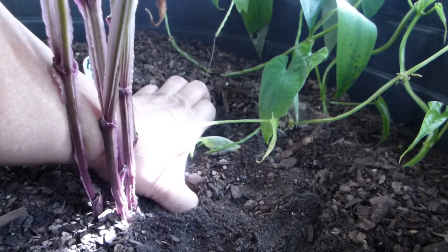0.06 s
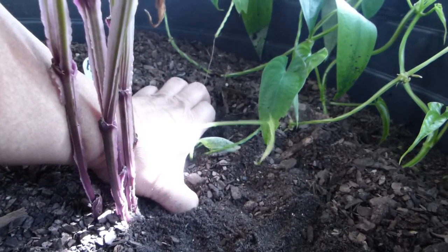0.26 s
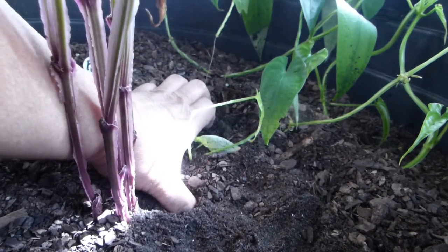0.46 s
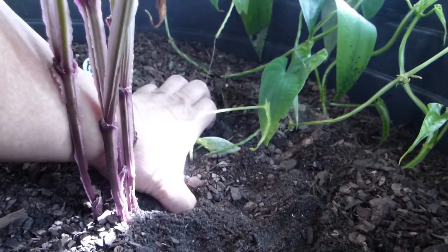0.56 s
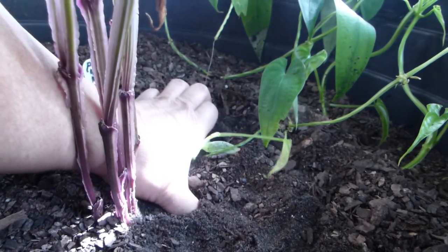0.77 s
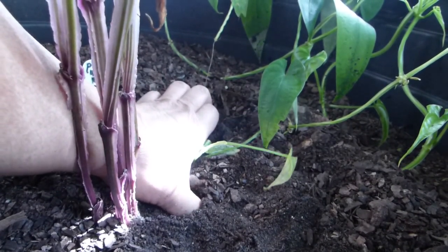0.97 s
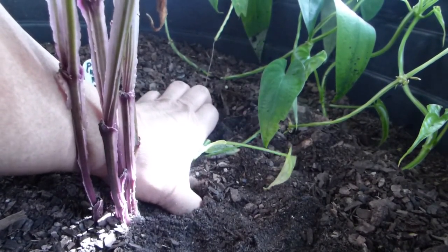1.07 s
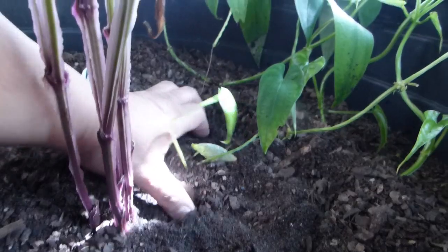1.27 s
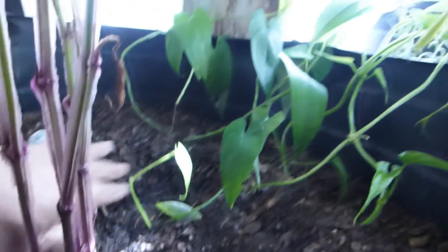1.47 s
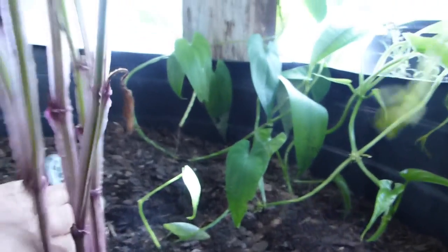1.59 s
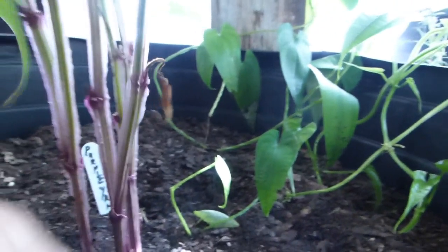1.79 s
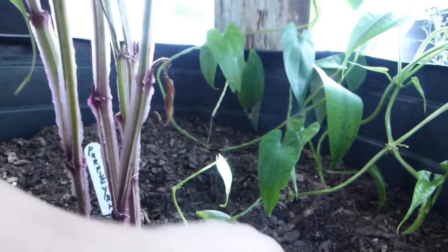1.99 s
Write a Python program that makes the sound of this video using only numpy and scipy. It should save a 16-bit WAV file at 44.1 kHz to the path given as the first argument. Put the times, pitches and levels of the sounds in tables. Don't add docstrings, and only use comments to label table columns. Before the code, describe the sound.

Fingers push into dry potting soil in a planter with bright gritty scraping and hollow knocks, stir it lightly with tiny snaps, then rake harder; close handheld stereo microphones, faint outdoor wash beneath.

```python
import sys
import numpy as np
from scipy import signal
from scipy.io import wavfile

SR = 44100
rng = np.random.default_rng(int(sys.argv[2]) if len(sys.argv) > 2 else 0)


def voltage_ratio(decibels):
    exponent = np.asarray(decibels, float) / 20
    return 10 ** exponent


def persist_wave(psi):
    counts = np.round(np.clip(psi, -1, 1) * 32767).astype(np.int16)
    wavfile.write(sys.argv[1], SR, np.atleast_2d(counts).T)


N = 90096

# [time_s, level_db, extra_fine_dust_db, extra_coarse_crumbs_db]
FINGER_DRAG = [(0, -32, -13, 13.5), (.05, -34, -17.5, 9), (.17, -48.5, -8, 6), (.23, -63, -1, -22),
               (.41, -52.5, 7, 6), (.46, -53, 4, 1), (.78, -50.5, 5.5, 4.5), (.99, -51.5, 8.5, 1),
               (1.06, -42, 8.5, 2), (1.16, -57.5, 2, -2), (1.23, -56.5, 6, -2), (1.33, -35.5, -20, -35),
               (1.4, -40.5, 3.5, 4), (1.46, -37, 14, 7), (1.545, -30, 3, -24), (1.6, -36, 2, 7.5),
               (1.9, -32, 3, 0.5), (2.04, -34.5, -12, -2)]
# [pitch_hz, density_db_per_hz]
SOIL_COLOUR = [(1200, -13.5), (2200, -9.5), (3400, -9.5), (4100, -1.5), (6000, -4.5), (8800, -2.5),
               (12000, -12.5), (15000, -45)]
# [pitch_hz, side_under_mid_db]
SOIL_WIDTH = [(1200, -10), (2500, -34), (5000, -25), (9000, -8), (15000, -4)]
# [pitch_hz, width_hz, level_db]
CRUMB_HOLLOWS = [(3144, 240, -24), (4080, 280, -13.5), (4794, 82, -22.5), (8130, 87, -14.5)]
# [middle_s, length_s, level_db, pitch_hz, breadth_ratio]
CRUMBLE_BURSTS = [(0.045, 0.049, -40, 5570, 1.7), (0.107, .025, -49, 5200, 1.1),
                  (0.148, 0.036, -54, 8000, 1.13), (.302, .01, -46.5, 7800, 1.36),
                  (0.451, 0.013, -47, 6000, 1.4), (.488, 0.014, -46.5, 5100, 1.9),
                  (.54, 0.051, -60, 4200, 1.04), (.637, .016, -55, 4800, 0.98),
                  (0.68, 0.0068, -48.5, 6950, 1.2), (0.74, 0.062, -50, 7200, 1.44),
                  (0.747, 0.014, -46.5, 6000, 1.3), (0.853, .07, -56.5, 4740, 1.2),
                  (.946, 0.031, -43.5, 6100, 1.45), (1.264, 0.043, -53.5, 9000, 1.34),
                  (1.32, 0.076, -43, 8060, 1.38), (1.332, 0.048, -44, 4090, 0.81),
                  (1.454, 0.038, -35, 5900, 1.8), (1.49, 0.17, -47, 14000, 1.06),
                  (1.573, 0.027, -33.5, 3960, 1.33), (1.646, 0.058, -37.5, 4300, 1.15),
                  (1.71, 0.068, -49, 11000, 1.4), (1.723, 0.047, -41.5, 4270, 1.3),
                  (1.866, 0.092, -42.5, 3270, 1.01), (1.88, .06, -39.5, 8460, 1.3),
                  (2.017, .04, -48, 10800, 1.15)]
# [start_s, peak_db, pitch_hz, breadth_ratio]
CHIP_SNAPS = [(0.2976, -33, 8950, 1.7), (0.3532, -41.5, 8350, 1.1), (0.3713, -35, 9300, 1.4),
              (.477, -38, 8000, 1.4), (0.445, -33, 6900, 1.9), (0.5732, -36.5, 6000, 1.3),
              (.5814, -41, 11500, 1.4), (.615, -45, 11600, 1.25), (.6235, -41, 11700, 1.06),
              (.6235, -41, 7800, 1.1), (.636, -39, 11700, 1.06), (.6445, -44, 11800, 1.24),
              (.636, -35.5, 7940, 1.1), (.6445, -36, 8400, 1.5), (.672, -35, 6900, 1.24),
              (.7127, -42, 11400, 1), (.713, -27, 5740, 2.2), (.724, -44, 11500, 1), (.728, -39, 6700, 1.1),
              (.737, -41, 11600, 1.04), (.7487, -33, 5900, 1.9), (0.758, -33, 5270, 1.2),
              (0.758, -34, 8560, 1.16), (0.674, -37, 2940, 2.7), (.8295, -42, 6400, 1.06),
              (1.0095, -38, 7950, 1.3), (1.246, -42, 10500, 1.15), (1.2714, -35, 8500, 1.4),
              (1.3114, -34, 7000, 2), (1.364, -35, 7000, 1.7), (1.4226, -28.5, 10300, 1.2),
              (1.5665, -24, 5000, 1.2), (1.668, -27, 10300, 1.15), (1.7068, -21, 9900, 1.24),
              (1.728, -29, 5440, 1.1), (1.729, -22.5, 9300, 1.14), (1.9644, -18, 9700, 1.14)]
# [pitch_hz, level_db, t60_s]
BARK_MODES = [(3220, -5.5, 0.017), (5730, 2, 0.012), (7130, 5, 0.008), (7900, -7, 0.014),
              (4950, -19, 0.0108), (8950, -9, .008)]
# [time_s, level_db, one_sidedness_db]
HAND_PUSH = [(0, -40.5, -20), (.012, -43.5, -20), (.035, -39.5, -20), (.07, -45, -10), (.18, -51, -16.5),
             (.24, -66.5, -17), (1.25, -63, -20), (1.34, -46.5, -11), (1.43, -48, 2), (1.47, -41.5, -3),
             (1.54, -33.5, -1.5), (1.585, -33, -2), (1.62, -38.5, -2), (1.78, -40.5, -4),
             (1.9, -46.5, -3.5), (1.95, -53, -5), (2.04, -47, -2)]
# [start_s, peak_db, favoured_pitch_hz, one_sidedness_db]
WALL_KNOCKS = [(.002, -23, 1300, -12), (.004, -23.5, 700, -13), (.004, -31, 367, -19),
               (0.025, -32.5, 377, -18), (.0085, -18, 1300, -14), (.015, -22, 697, -20),
               (.023, -16.5, 1280, -17), (.04, -29, 1440, -12), (.051, -27, 1300, -12),
               (.105, -37.5, 620, -18), (.137, -39, 590, -16), (.674, -42, 875, -14.5),
               (.758, -36, 1480, -11.5), (1.071, -31.5, 235, -11), (1.4425, -16, 966, -8),
               (1.4429, -27, 754, -4), (1.445, -23.5, 398, 3), (1.479, -32, 370, 6), (1.516, -27, 770, -21),
               (1.524, -23.5, 1000, -15), (1.53, -27.5, 375, 3), (1.535, -27, 1090, -10),
               (1.537, -25, 800, -19), (1.545, -30, 900, -10), (1.558, -28.5, 680, -8),
               (1.566, -26.5, 385, 2), (1.5667, -18.5, 1880, -8), (1.566, -19, 1135, -11),
               (1.5707, -22.5, 924, -15), (1.574, -27, 1150, -8), (1.683, -25, 1590, 0),
               (1.742, -24.5, 315, -10), (1.776, -22, 300, -15), (1.85, -29.5, 300, -6)]
# [pitch_hz, level_db, t60_s, one_sidedness_db]
WALL_MODES = [(163, -4, 0.029, -28), (235, -6.5, 0.036, -16), (300, -8, 0.057, -5), (375.4, -2, 0.086, -9),
              (588, 1.5, 0.052, -4.5), (710, 2, 0.025, -2.5), (800, 2, 0.054, -2.5), (954, 2, 0.019, 2),
              (1135, -1, 0.05, -7), (1300, 0, 0.028, -16), (1475, -5.5, 0.022, -6),
              (1643, -0.5, 0.045, -27), (1850, -5, 0.057, -14), (2300, 3, 0.0022, -10.5)]
# [middle_s, level_db]
PIPE_THROBS = [
    (.41, -57),
    (.49, -55.5),
    (0.582, -54.5),
    (.64, -54),
    (.695, -53.5),
    (.85, -51.5),
    (0.974, -48.5),
]
# [pitch_hz, density_db_per_hz]
GARDEN_COLOUR = [(20, -13.5), (100, -11.5), (250, -7.5), (800, -5.5), (1500, -9), (2500, -19),
                 (8000, -24.5), (15600, -34)]
# [pitch_hz, side_under_mid_db]
GARDEN_WIDTH = [(25, -13), (125, -15), (300, -11.5), (1000, -5), (1600, -16), (4000, -12), (15000, -22)]


def rms_one(x):
    return x / np.sqrt(np.mean(x ** 2) + 1e-20)


def in_time(rows):
    s, *columns = np.transpose(rows)
    return [np.interp(np.arange(N) / SR, s, column) for column in columns]


def at_hz(points, hz):
    points_hz, points_db = np.transpose(points)
    return np.interp(np.log(hz), np.log(points_hz), points_db)


def drift(rate_hz):
    r = np.exp(-40 * np.pi * rate_hz / SR)
    slow = signal.lfilter([1], [1, -2 * r, r * r], rng.standard_normal(N // 20 + 2002))[2000:]
    return np.interp(np.arange(N) / 20, np.arange(len(slow)), rms_one(slow - slow.mean()))


def ring(hits, hz, t60):
    r = voltage_ratio(-60 / (max(t60, .001) * SR))
    w = 2 * np.pi * hz / SR
    return signal.lfilter([0, np.sin(w)], [1, -2 * r * np.cos(w), r * r], hits + 1e-18)


def band(x, low_hz, high_hz):
    sos = signal.butter(2, [low_hz, min(high_hz, .45 * SR)], "band", fs=SR, output="sos")
    return signal.sosfilt(sos, x)


def high(x, hz):
    return signal.sosfilt(signal.butter(4, hz, "high", fs=SR, output="sos"), x)


def low(x, hz):
    return signal.sosfilt(signal.butter(2, hz, fs=SR, output="sos"), x)


def clicks(per_s, spread_db):
    size = voltage_ratio(spread_db * np.minimum(rng.exponential(1, N), 5)) * rng.choice([-1, 1], N)
    return size * (rng.random(N) < per_s / SR)


def spike(s, gain):
    return gain * (np.arange(N) == int(s * SR))


def stereo(mid, side):
    return np.array([mid + side, mid - side])


def soil():
    grains_per_s, grain_spread_db, grain_cycles, hiss_db = 9100, 2.5, 8.4, 3.5
    t = np.arange(N) / SR
    level_db, fine_db, coarse_db = in_time(FINGER_DRAG)
    grains = clicks(grains_per_s * voltage_ratio(3.0 * drift(60)), grain_spread_db)
    pitches = np.geomspace(1200, 15000, 24)
    dealt = rng.integers(0, 24, N)
    white = rng.standard_normal((3, N))
    clump_db = 0.1173 * np.clip(-36 - level_db, 0, 20) * drift(28.0)
    shift = 1 + 0.13 * (t < .25)
    out = 0
    for k, hz in enumerate(pitches):
        ringing = rms_one(ring(grains * (dealt == k), hz, grain_cycles / hz))
        hiss = rms_one(band(white[k % 2], hz / 1.06, hz * 1.06))
        mid = ringing + voltage_ratio(hiss_db) * hiss
        side = voltage_ratio(at_hz(SOIL_WIDTH, hz)) * rms_one(band(white[2], hz / 1.06, hz * 1.06))
        fine_tilt_db = fine_db * np.clip(np.log2(hz / 6000), 0, 2) ** 2
        coarse_tilt_db = coarse_db * np.clip(np.log2(4000 / hz), 0, 1)
        patchy_db = 1.2 * drift(8.7)
        colour_db = at_hz(SOIL_COLOUR, hz / shift) + fine_tilt_db + coarse_tilt_db
        out = out + np.sqrt(hz) * voltage_ratio(colour_db + clump_db + patchy_db) * stereo(mid, side)
    for hz, width_hz, db in CRUMB_HOLLOWS:
        mid, side = ring(white[::2], hz, 2.8 / width_hz) * voltage_ratio([[0], [-16]])
        out = out + voltage_ratio(db) * np.std(out) * rms_one(stereo(mid, side))
    out = low(out, 13700)
    lift_s, lift_length_s, lift_db = 1.947, 0.032, -8
    lift = lift_db * np.exp(-((t - lift_s) / lift_length_s) ** 2)
    return voltage_ratio(level_db + lift) * rms_one(out)


def crumbles():
    t, out = np.arange(N) / SR, 0
    grit = clicks(5000.0, spread_db=0.5)
    for s, length, db, hz, breadth in CRUMBLE_BURSTS:
        swell = np.exp(-2 * ((t - s) / (length / 2)) ** 4)
        ratio = max(breadth, 1.04)
        burst = swell * band(grit, hz / ratio, hz * ratio)
        out = out + voltage_ratio(db) * burst * np.sqrt(np.sum(swell ** 2) / np.sum(burst ** 2))
    return out


def snaps():
    crack_s, crack_db = .5153, -31
    t60_s, ring_db = .0055, -14.5
    bark = sum(ring(spike(crack_s, voltage_ratio(crack_db + db)), hz, t60) for hz, db, t60 in BARK_MODES)
    out = low(high(bark, 2670), 10000)
    t, white = np.arange(SR // 20) / SR, rng.standard_normal(N)
    for s, db, hz, breadth in CHIP_SNAPS:
        at = slice(int(s * SR), int(s * SR) + len(t))
        crackle = white[at] * voltage_ratio(-60 * t / t60_s)
        burst = crackle + ring(voltage_ratio(ring_db) * (t == 0), hz, t60_s)
        ratio = max(breadth, 1.05)
        tick = band(band(burst, hz / ratio, hz * ratio), hz / ratio, hz * ratio)
        out[at] += voltage_ratio(db) * tick / np.abs(tick).max()
    return out


def planter():
    slips_per_s, slip_spread_db = 1200, 1.5
    early_s, early_hz, early_lift_db = 0.22, 1300, 19
    knock_octaves, contact_s = 0.24, .0001
    level_db, side_db = in_time(HAND_PUSH)
    early = np.exp(-np.arange(N) / SR / early_s)
    mid, side, knock = 0, 0, 0
    for k, (hz, db, t60, lean_db) in enumerate(WALL_MODES):
        sign = (-1) ** k
        lag = int(.2 * SR / hz)
        slips = ring(clicks(slips_per_s * voltage_ratio(4.0 * drift(30)), slip_spread_db), hz, t60)
        lift_db = early * early_lift_db * np.exp(-(np.log2(hz / early_hz) / 0.17) ** 2)
        slips = rms_one(slips) * voltage_ratio(db + lift_db)
        mid = mid + slips
        side = side - sign * voltage_ratio(lean_db) * np.roll(slips, lag)
        hits = np.zeros((2, N))
        for s, peak_db, near_hz, one_db in WALL_KNOCKS:
            off_pitch_db = -6.5 * (np.log2(hz / near_hz) / knock_octaves) ** 2
            gain = voltage_ratio(peak_db + db + off_pitch_db) * sign
            start = int(s * SR)
            hits[0, start] += gain
            hits[1, start + lag] -= gain * voltage_ratio(lean_db + one_db)
        knock = knock + ring(hits, hz, 0.79 * t60)
    soft = np.exp(-1 / (contact_s * SR))
    knock = signal.lfilter([1 - soft], [1, -soft], knock)
    scale = voltage_ratio(level_db) / np.sqrt(np.mean(mid ** 2))
    mid = scale * mid + knock[0]
    side = scale * voltage_ratio(side_db) * side + knock[1]
    return high(stereo(mid, side), 147)


def throbs():
    pitch_hz, width_hz, throb_s = 1034, 49, 0.019
    t = np.arange(N) / SR
    drone = rms_one(band(rng.standard_normal(N), pitch_hz - width_hz / 2, pitch_hz + width_hz / 2))
    swells = sum(voltage_ratio(db) * np.exp(-((t - s) / throb_s) ** 2) for s, db in PIPE_THROBS)
    return drone * swells * voltage_ratio([[3], [-9]])


def garden():
    level_db, patchy_db = -53, 1.2
    out, edges = 0, 20 * 2 ** np.arange(0, 10.1, .5)
    white = rng.standard_normal((2, 2, N + SR))
    for k, (low_hz, high_hz) in enumerate(zip(edges, edges[1:])):
        mid, side = band(white[k % 2], low_hz, high_hz)[:, SR:]
        hz = np.sqrt(low_hz * high_hz)
        side = voltage_ratio(at_hz(GARDEN_WIDTH, hz)) * side
        out = out + voltage_ratio(at_hz(GARDEN_COLOUR, hz) + patchy_db * drift(3.5)) * stereo(mid, side)
    return voltage_ratio(level_db) * rms_one(out)


def scene():
    grit = high(soil() + crumbles(), 570)
    return grit + snaps() + planter() + throbs() + garden()


def band_limit(x):
    return signal.sosfilt(signal.butter(12, 15770, fs=SR, output="sos"), x)


def record(dry):
    top_cut = signal.ellip(14, .5, 70, 15740, fs=SR, output="sos")
    mix = signal.sosfilt(top_cut, dry)
    return band_limit(mix)


dry = scene()
out = record(dry)
persist_wave(out)
```